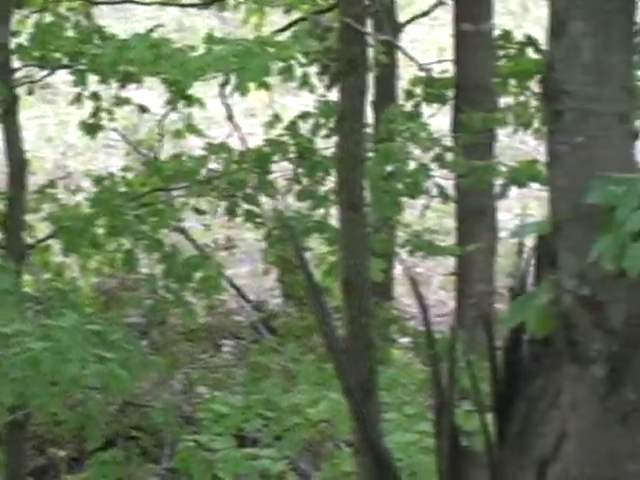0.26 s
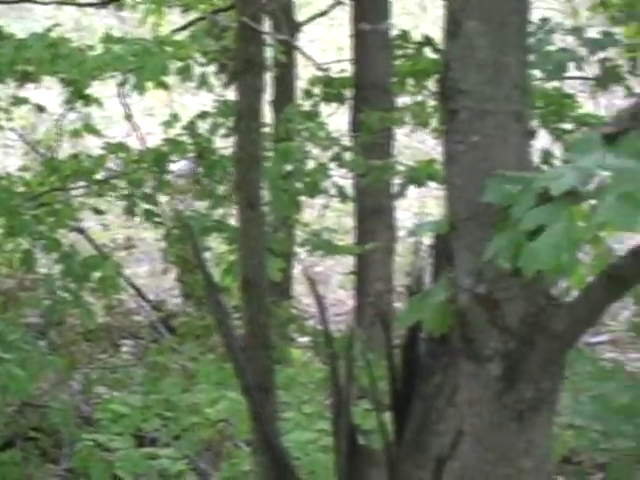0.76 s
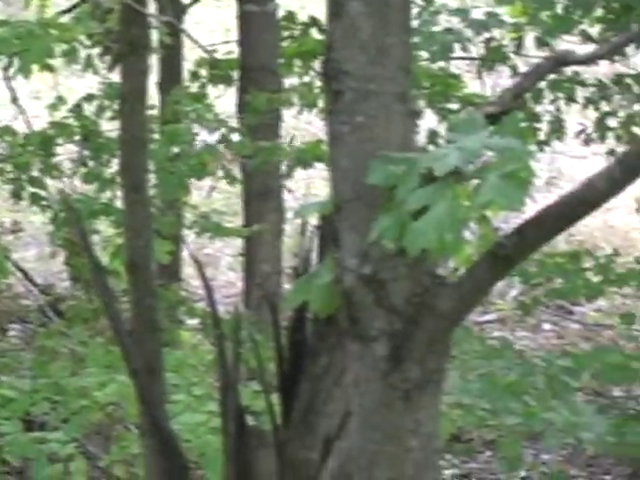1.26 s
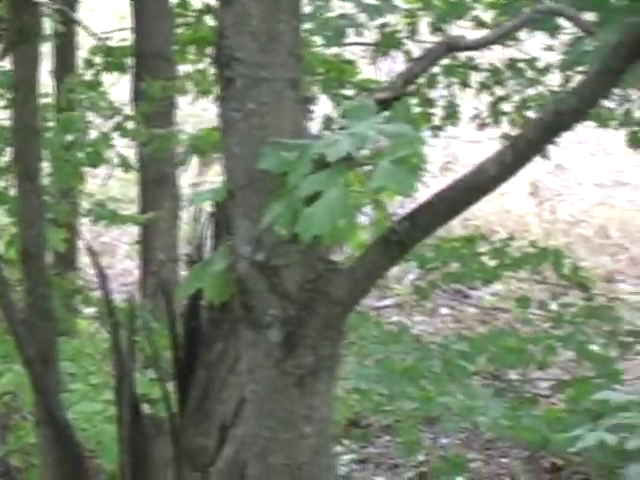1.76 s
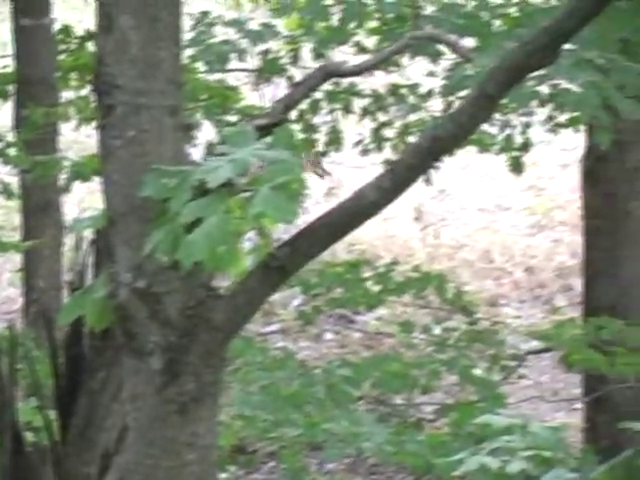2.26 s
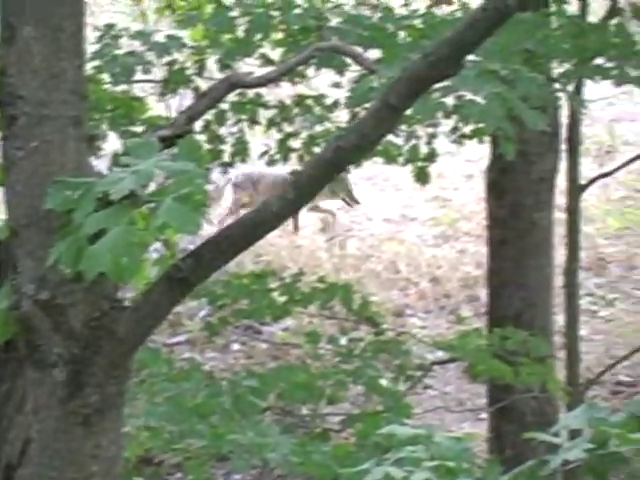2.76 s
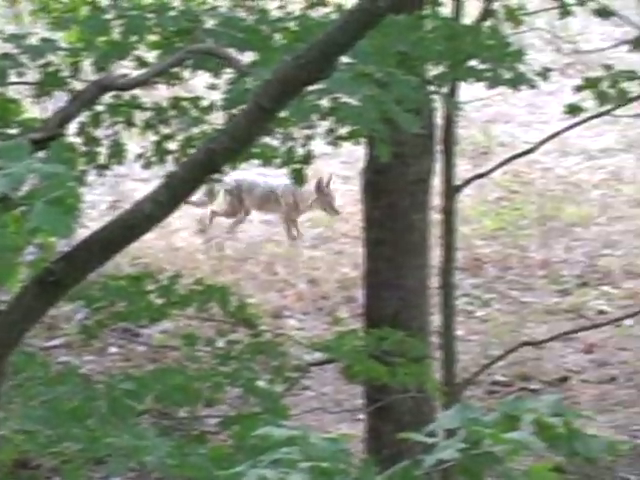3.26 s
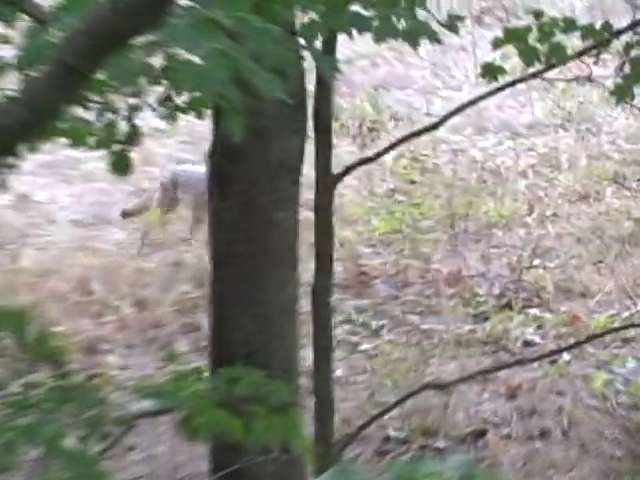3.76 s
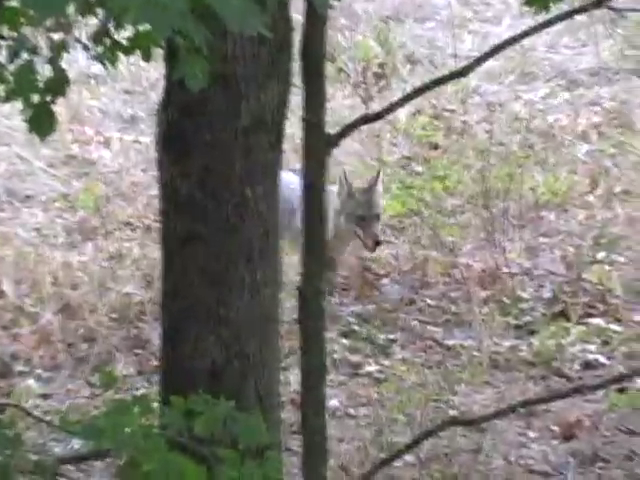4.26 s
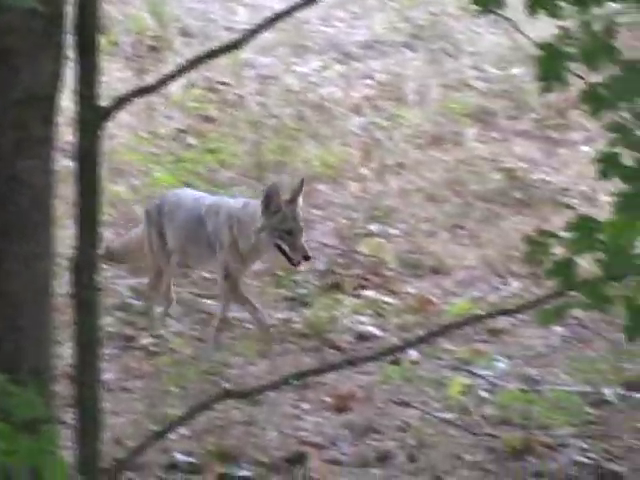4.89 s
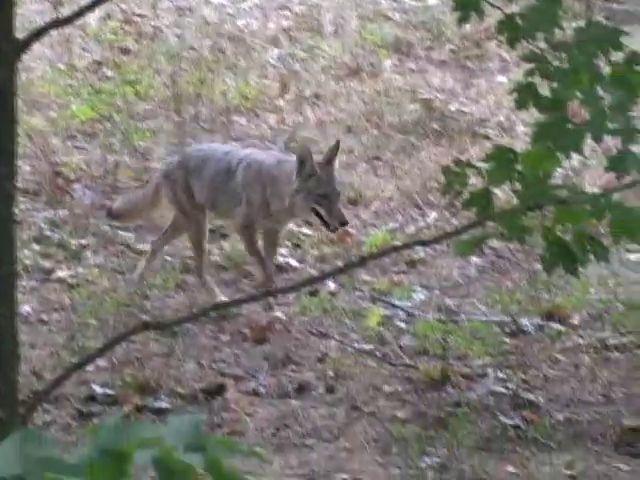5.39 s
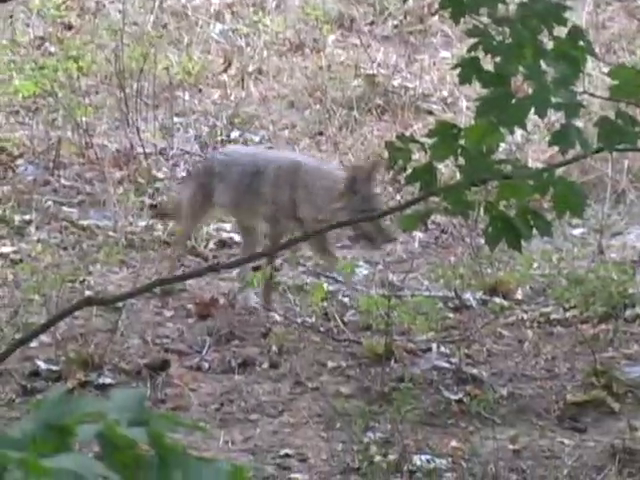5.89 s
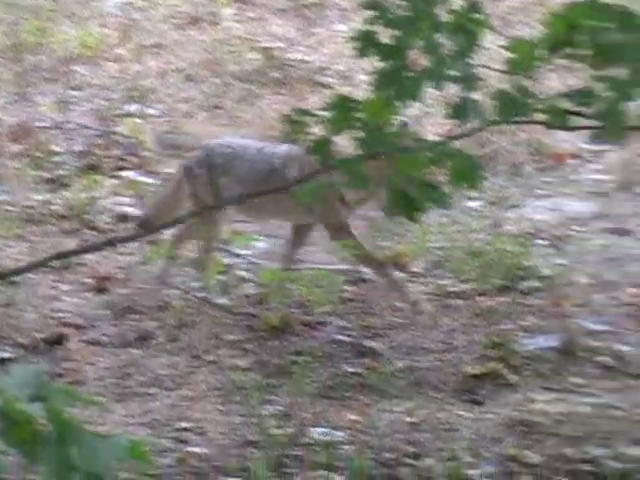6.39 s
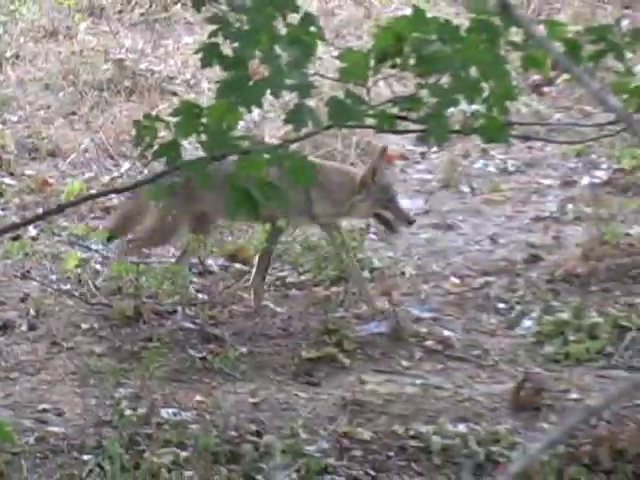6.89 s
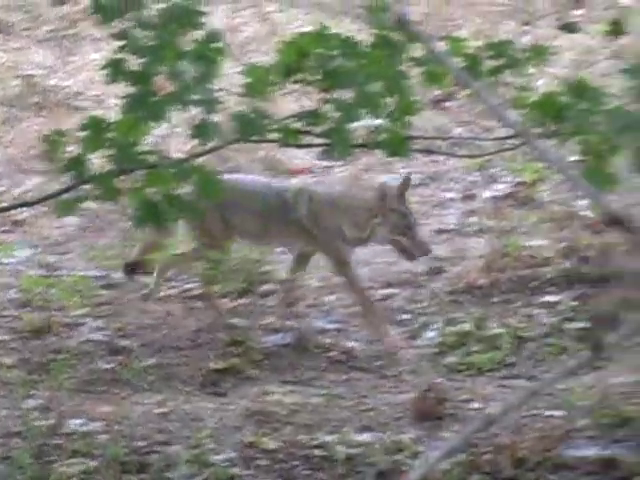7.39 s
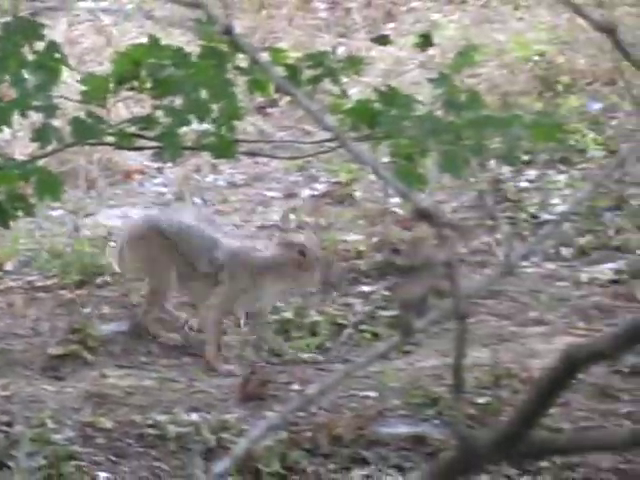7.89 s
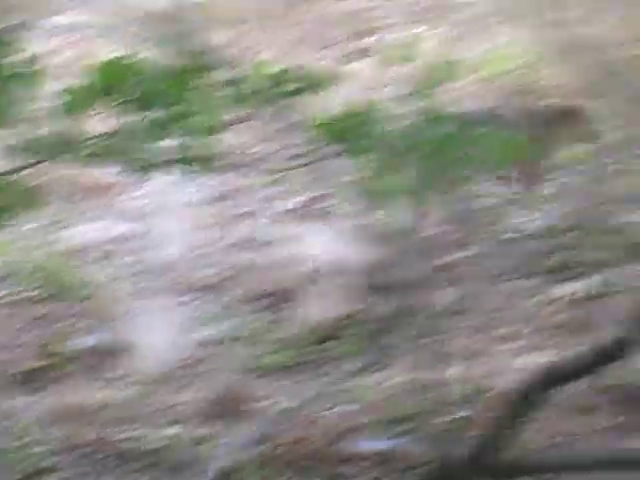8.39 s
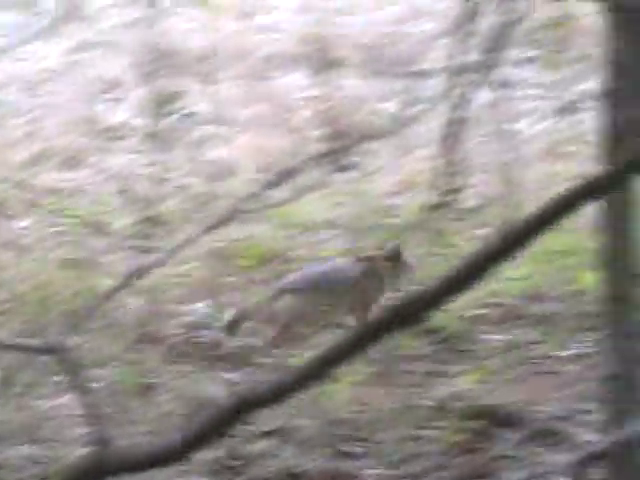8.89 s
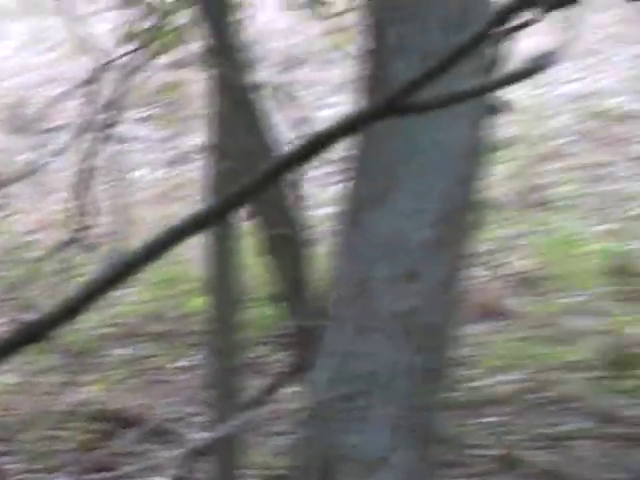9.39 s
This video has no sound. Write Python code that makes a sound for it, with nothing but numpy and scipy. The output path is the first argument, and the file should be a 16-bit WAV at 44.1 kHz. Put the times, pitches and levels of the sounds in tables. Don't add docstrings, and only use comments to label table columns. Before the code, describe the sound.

Crickets and katydids shimmer as paws pad through dry leaves; a bow snaps, an arrow thumps, and the animal bolts, crashing away with a short yelp.

```python
import sys
import numpy as np
from scipy import signal
from scipy.fft import rfft, irfft, next_fast_len
from scipy.io import wavfile
from scipy.ndimage import uniform_filter1d, map_coordinates

SR = 44100
rng = np.random.default_rng(int(sys.argv[2]) if len(sys.argv) > 2 else 0)


def transcribe(u):
    v = np.clip(np.atleast_2d(u).T, -1, 1)
    q = np.round(v * 32767).astype(np.int16)
    wavfile.write(sys.argv[1], SR, q)


def how_loud(loudness_db):
    steps = np.asarray(loudness_db, float) / 20
    return 10 ** steps


N = 425549
TIME = np.arange(N) / SR
BOLT_S = 7.99


def unit(x):
    return x / np.sqrt(np.mean(x ** 2) + 1e-20)


def noise():
    return rng.standard_normal((2, N))


def along(points, hz):
    f, v = np.transpose(points)
    return np.interp(np.log(hz + 1), np.log(f + 1), v)


def curves(rows):
    s, *cols = np.transpose(rows)
    return [np.interp(TIME, s, c, left=-120, right=-120) for c in cols]


def wobble(rate):
    return map_coordinates(rng.standard_normal(int(N * rate / SR) + 4), [TIME * rate])


def filtered(x, response):
    m = next_fast_len(x.shape[-1] + 8192, real=True)
    return irfft(rfft(x, m) * response(np.fft.rfftfreq(m, 1 / SR)), m)[..., :x.shape[-1]]


def spread(pair, spectrum, alike):
    def shares(hz):
        turn = np.arccos(np.clip(along(alike, hz), -1, 1)) / 2
        return how_loud(along(spectrum, hz)) * [np.cos(turn), np.sin(turn)]
    mid, side = filtered(pair, shares)
    return unit(np.array([mid + side, mid - side]))


def onset(t, rise):
    return 1 - np.exp(-t / rise)


def ring(modes, t):
    return sum(how_loud(db + rng.normal(0, 2) - 60 * t / t60) * np.sin(2 * np.pi * hz * t)
               for hz, db, t60 in modes)


def add(track, s, sound):
    start = round(s * SR)
    track[..., start:start + sound.shape[-1]] += sound[..., :N - start]


def swells(start, db, fade, rise, hold=0):
    grid = np.arange(0, N / SR + .002, .001)
    start, fade, hold = (np.reshape(v, (-1, 1)) for v in (start, fade, hold))
    before = np.maximum(start - grid, 0) / (rise * fade)
    after = np.maximum(grid - start - hold, 0) / fade
    return np.interp(TIME, grid, np.sqrt(how_loud(db) ** 2 @ how_loud(-20 * (before + after)) ** 2))


def echo(x):
    # frequency in Hz, t60 in seconds.
    trees = [(200, 0.29), (2000, 0.49), (8000, 1), (15000, 0.37)]
    hz, t, z = signal.stft(rng.standard_normal((2, SR // 2)), SR, nperseg=256)
    tail = signal.istft(z * how_loud(-60 * t / along(trees, hz)[:, None]), SR, nperseg=256)[1]
    late = np.pad(x, (500, 0))[None]
    return signal.fftconvolve(late, tail / np.linalg.norm(tail[0]), axes=1)[:, :N]


def woods():
    # frequency in Hz, density in dB per Hz.
    colour = [(15, -48), (25, -29), (59, -14), (102, -9.5), (148, -6.5), (174, -11.5), (200, -11.5),
              (2520, -24), (4950, -22), (5520, -15.5), (6140, -26), (7830, -15), (9460, -30.5),
              (14600, -50), (15800, -55)]
    # frequency in Hz, left-right likeness.
    alike = [(60, 0.88), (130, 0.27), (300, 0.36), (640, 0.15), (3000, 0.16), (15000, 0.97)]
    # start in seconds, level in dB, fade in seconds.
    gusts = [(.3, -67, 1.5), (.78, -60, 0.81), (1.37, -66, 0.67), (2.69, -61, .5), (3.5, -52, 1.04),
             (3.8, -60, 1), (4.11, -55, 0.4), (5.05, -62, 2.6), (6.86, -61, 0.8), (8.03, -54, 2.2),
             (9.2, -60, 2.4), (9.46, -50.5, .3)]
    floor = how_loud(-53.5 + 0.26 * wobble(1.95)) * spread(noise(), colour, alike)
    low_air = [(60, -45), (170, -4.5), (300, -2.5), (600, -18.0), (1200, -37)]
    stir = spread(noise(), low_air, [(300, 1.0)])
    drone = spread(noise(), [(45, -50), (66, -20), (76, -9), (88, -16.0), (130, -60)], [(76, 0.97)])
    drum_hz = 150 / 1.001
    hum = np.array([[how_loud(-52.5)], [-how_loud(-43)]]) * np.sin(2 * np.pi * drum_hz * TIME)
    s, db, fade = np.transpose(gusts)
    stir_gain = swells(s, db, fade, 0.36) * how_loud(-4.5 + 2.7 * wobble(9.9))
    return floor + stir_gain * stir + how_loud(-62.0) * drone + hum


def singer(hz, glide, life, rate, jitter, left_db, right_db, skips=(), uneven_db=1.0):
    marks = np.array([-1, *skips, N / SR + 1]) - life / 6
    missed = np.cumsum(np.round(np.diff(marks, prepend=-2) * rate))
    beat = np.floor(np.interp(TIME, marks, missed) + jitter * wobble(6.5) + 1e-6)
    strokes = (np.diff(beat, prepend=beat[0]) > 0) * ~np.isin(beat, missed)
    strokes = strokes * how_loud(uneven_db * (wobble(40) + wobble(5) / 2))
    age = np.arange(SR // 20) / SR / life
    pitch = hz * (1 + glide * (5 * age - 1))
    stroke = age ** 2 * np.exp(-12 * age) * np.sin(2 * np.pi * np.cumsum(pitch) / SR)
    return unit(signal.oaconvolve(strokes, stroke)[:N]) * how_loud([[left_db], [right_db]])


def insects():
    # pitch in Hz, glide share, stroke life in seconds, pulses per second,
    # jitter in strokes, left level in dB, right level in dB.
    cricket = (5600, -.045, .016, 71, .03, -59, -65)
    katydid = (7740, .035, .05, 26.5, .22, -69, -60)
    skips = [.061, .231, .336, .793, 1.033, 1.11, 1.343, 1.499, 1.739, 1.81, 2.063, 2.47, 2.625, 3.105,
             3.261, 4.42, 4.66, 4.744, 4.835, 4.911, 4.996, 5.081, 5.165, 5.25, 5.334, 5.503, 6.496, 7.234,
             7.318, 7.403, 7.487, 7.571]
    # start in seconds, hold in seconds, level in dB.
    chirps = [(0, 0.65, -63.5), (.83, 0.22, -65), (1.36, .17, -66), (1.8, 0.15, -61), (2.198, .26, -61),
              (2.75, 0.41, -63), (3.33, 0.46, -61), (4.0, 0.16, -59), (4.62, .26, -63), (5.03, .03, -66),
              (5.67, .18, -61), (6.25, 0.26, -65), (7.07, 0.27, -60), (7.5, .03, -68)]
    # frequency in Hz, density in dB per Hz.
    many = [(6300, -30), (6900, -7.5), (7700, -4), (8300, -7), (9000, -22)]
    chorus = how_loud(-54.0 + 0.99 * wobble(20)) * spread(noise(), many, [(7000, 0.4)])
    far_colour = [(4100, -40), (4300, -3), (4450, -1), (4600, -2), (4800, -36)]
    blur = spread(noise(), far_colour, [(4400, 0.72)])
    near = how_loud(0.8) * singer(*cricket, skips) + how_loud(1.7) * singer(*katydid)
    s, hold, db = np.transpose(chirps)
    pulses = how_loud(5 * np.cos(2 * np.pi * 19 * TIME) - 4.0)
    return near + swells(s, db - 2.0, 0.21, 0.66, hold) * pulses * blur + chorus


def crackle(density):
    size_db = np.minimum(2.2 * rng.exponential(size=(2, N)), 9)
    clicks = (rng.random((2, N)) < density / SR) * how_loud(size_db) * rng.choice([-1, 1], (2, N))
    clumps = how_loud(.5 * wobble(70) + 1.3 * wobble(300))
    return (noise() + .8 * unit(clicks)) * clumps


def snapping():
    # time in seconds, peak in dB, pitch in Hz.
    twigs = [(0.0335, -46, 4410), (0.1374, -44, 4840), (0.231, -44, 4890), (0.5786, -48, 3910),
             (3.189, -52, 2150), (3.253, -52.5, 1950), (3.6102, -55, 2000), (3.7085, -48, 4230),
             (3.824, -48, 4780), (4.123, -44, 3400), (4.2256, -47, 3300), (4.007, -52, 3100),
             (4.055, -50.5, 3100), (.82, -53, 1500), (.845, -54, 1700), (.89, -54, 2000),
             (4.3374, -49, 4930), (5.4324, -58, 3400), (6.7695, -47, 3300), (6.805, -47, 3140),
             (6.8649, -46, 3250), (6.849, -52, 2600), (6.882, -52, 4200), (1.953, -58, 2400),
             (2.043, -58, 3100), (4.337, -51, 2500), (4.372, -56, 2380)]
    ticks = [(0.266, -35, 12900), (0.2922, -38, 12900), (0.3446, -39, 13000), (2.2766, -37, 13600),
             (6.5964, -41, 12300), (7.1571, -50, 12300), (7.1896, -49, 12400), (7.5797, -48, 10600),
             (8.3428, -21, 10000), (8.343, -23, 6000), (8.6884, -22, 11000), (8.6886, -24, 6500),
             (8.6925, -23, 10500), (8.6924, -19, 7000), (8.062, -36, 11000), (9.122, -32, 8000),
             (8.1249, -29.5, 3810), (8.3874, -22, 5500), (8.7258, -24, 4860), (8.761, -27.5, 5490),
              (8.8024, -27, 3810), (8.842, -21.5, 5020), (8.9744, -26, 6500), (9.0555, -29, 6900),
              (8.9015, -20, 5000), (8.3105, -22, 5200), (8.57, -23, 5500), (8.505, -30, 5500),
              (8.5225, -30, 5500), (9.1238, -29, 7500), (9.2247, -30, 6000), (9.4635, -28, 5300),
              (9.563, -34, 5500), (9.645, -34, 5500), (8.305, -25, 7500), (8.5385, -28, 4800),
              (8.5535, -25, 5500), (9.176, -26, 5500)]
    sticks = [(7.9805, -27.5, 6900), (8.015, -36, 2400), (8.258, -43, 1500), (8.304, -36.5, 1250),
              (8.315, -43, 620), (8.35, -43, 620), (8.384, -42, 1250), (8.545, -40, 2630),
              (8.585, -44, 2900), (8.81, -44, 700), (8.9, -44, 1000), (9.0545, -28.5, 6900),
              (9.078, -35, 7000), (9.172, -43, 1500), (9.46, -41, 2800), (9.49, -38, 3100)]
    # breaks, t60 in seconds, rise in seconds, resonance width over pitch.
    kinds = [(twigs, 0.05, 0.0027, 0.66), (ticks, 0.0046, 0.00023, .85),
             (sticks, 0.048, 0.0027, 0.73)]
    snaps, t = np.zeros(N), np.arange(SR // 4) / SR
    for breaks, t60, rise, width in kinds:
        for s, db, hz in breaks:
            grit = filtered(rng.standard_normal(len(t)),
                            lambda f: (1j * f * hz / (hz * hz - f * f + 1j * f * width * hz)) ** 2)
            add(snaps, s, how_loud(db + 3.5 - 60 * t / t60) * onset(t, rise) * unit(grit))
    return snaps


def walking():
    # start in seconds, rustle in dB, brightness in dB, fade in seconds.
    steps = [(.05, -64, -12, 0.6), (.24, -57, -4, 0.53), (.57, -59, 5, .3), (.85, -56.5, 2, 0.29),
             (1.17, -61.5, -4, .35), (1.47, -59, 0, 0.3), (1.68, -79, -4, 0.093), (1.78, -71, -3, .1),
             (2.06, -66, 2, 0.44), (2.33, -62, 3, 0.22), (2.7, -63, 3, 0.69), (2.87, -62.5, 2, 0.08),
             (3.05, -66.5, 7, 0.68), (3.25, -71, 2, 0.19), (3.37, -66, -9, 0.031), (3.48, -70, -9, 0.13),
             (3.71, -60.5, -1, 0.29), (4.03, -56, -2, 0.22), (4.14, -60.5, -2, .15), (4.24, -60, -5, 0.13),
             (4.33, -59.5, -1, 0.17), (4.58, -61, 9, 0.11), (5.03, -61, 1, .03), (5.5, -60, 1, 0.066),
             (5.96, -63, 2, 0.18), (6.2, -62.5, -3, 0.39), (6.6, -61, 7, 0.14), (6.78, -58, 4, 0.12),
             (6.88, -56.5, -1, 0.27), (7.17, -60, 3, .08), (7.36, -62.5, -13, .15), (7.47, -67, -3, .3)]
    s, db, bright_db, fade = np.transpose(steps)
    return [swells(s, db + more_db, fade, 0.63) for more_db in (7, bright_db - 5.5)]


def leaves():
    # frequency in Hz, density in dB per Hz.
    dry_leaves = [(710, -33), (1200, -16), (1750, -13.5), (3300, -5), (4820, 0.5), (6250, -2.5), (7190, -1),
                  (8180, -5.5), (12600, -19), (14800, -40), (15800, -60)]
    # frequency in Hz, density in dB per Hz.
    soft_ground = [(150, -31), (250, -11), (634, 3.5), (823, -1), (1300, -3), (1800, -11), (2600, -44),
                   (4400, -120)]
    # time in seconds, level in dB.
    canopy = [(0, -70), (2.4, -68.5), (3.3, -68), (3.7, -72), (6.4, -90), (7.6, -91)]
    alike = [(300, 0.89), (1400, 0.85), (7000, 0.92), (15000, 0.89)]
    body = spread(crackle(4000), dry_leaves, alike)
    treble = [(6000, -22), (9500, 1), (13000, 0.0), (14900, -8), (15800, -27)]
    crisp = spread(crackle(3000), treble, alike)
    paws = spread(crackle(1600), soft_ground, alike)
    walk, walk_crisp = walking()
    weight, weight_crisp, weight_paw = bolting()
    litter = (walk + weight) * body
    litter += (np.hypot(walk_crisp, how_loud(curves(canopy)[0])) + weight_crisp) * crisp
    litter += (weight_paw + how_loud(-17) * walk) * paws
    snaps = snapping()
    return litter + snaps + how_loud(-9.5) * echo(snaps)


def crow():
    # middle in seconds, pitch in Hz, level in dB.
    caws = [(1.42, 1303, -63), (2.08, 1415, -61), (2.6, 1680, -61), (2.74, 1404, -58.5), (3.45, 1384, -61),
            (4.18, 1320, -58.5), (4.879, 1290, -61), (5.55, 1306, -60), (6.199, 1340, -61),
            (6.88, 1350, -71)]
    calls, u = np.zeros(N), np.linspace(-1, 1, SR // 6)
    for s, hz, db in caws:
        pitch = hz * (1 - 0.0986 * u ** 2 - 0.042 * u)
        hoarse = unit(uniform_filter1d(rng.standard_normal(len(u)), size=170)) + 0.67
        tone = np.sin(2 * np.pi * np.cumsum(pitch) / SR)
        add(calls, s - 1 / 12, how_loud(db - 5.0) * (1 - u ** 2) * hoarse * tone)
    return calls


def limb_knock():
    # frequency in Hz, level in dB, t60 in seconds.
    modes = [(397, -7, 0.092), (500, -5, .03), (612, 3.5, 0.03), (700, -0.5, 0.034), (916, 0, 0.021),
             (1130, -2, 0.028), (1346, -7, 0.07), (1710, -0.5, 0.027), (2110, -4, 0.022), (2640, -8, 0.023),
             (3100, -13, .02), (4200, -19, .012)]
    # time in seconds, level in dB.
    taps = [
        (3.3642, -47),
        (3.3657, -32.5),
        (3.37, -47),
        (3.377, -49),
    ]
    t, taps_heard = np.arange(SR // 2) / SR, np.zeros(N)
    for s, db in taps:
        dull = uniform_filter1d(rng.standard_normal(len(t)), size=16)
        tap = ring(modes, t) * onset(t, 0.0004) + 3 * how_loud(-60 * t / 0.039) * dull
        add(taps_heard, s, how_loud(db) * tap)
    return taps_heard


def twang(t):
    # multiple of its pitch, level in dB.
    partials = [(2, 2), (3, -4), (4, 2), (5, -9), (6, -13), (7, -5), (8, -7), (9, -9)]
    pitch_hz, t60 = 97.5, 0.21
    swing = sum(how_loud(db - 60 * t / t60 * (1 + 0.041 * k)) * np.cos(2 * np.pi * k * pitch_hz * t)
                for k, db in partials)
    return -how_loud(-21.5) * swing * (1 - np.exp(-(t / 0.013) ** 2))


def string_slaps():
    # time in seconds, ring in dB, clatter in dB.
    slaps = [(7.6677, -29, -18.5), (7.6706, -14, -14.5), (7.6768, -19.5, -14.5), (7.679, -34, -16),
             (7.684, -29, -19), (7.688, -32, -25), (7.693, -31, -27), (7.7, -31, -29), (7.71, -29, -24),
             (7.7215, -40, -29), (7.7303, -36, -31), (7.741, -49, -37), (7.758, -37, -39),
             (7.79, -40.5, -57)]
    # frequency in Hz, level in dB, t60 in seconds.
    limbs = [(189, -2, 0.12), (295, 3, 0.049), (341, 6.5, 0.058), (455, -2, 0.075), (647, -2.5, 0.058),
             (715, -7.5, 0.15), (529, -3.5, 0.11)]
    # frequency in Hz, level in dB, t60 in seconds.
    grip = [(1000, -12, 0.064), (1385, 1.5, 0.073), (2250, 0.5, 0.042), (2740, -26, 0.04), (3080, -18, .05),
            (4130, -8, .04), (4950, 4, 0.027), (5700, -5, 0.025), (7440, 2, .04), (11000, -14, 0.07)]
    t = np.arange(SR // 2) / SR
    frame, clatter_gain = np.zeros(N), np.zeros(N)
    for s, ring_db, clatter_db in slaps:
        tired_db = 150 * (s - slaps[0][0])
        limb_ring = -how_loud(ring_db - 3.5) * ring(limbs, t)
        grip_ring = how_loud(clatter_db - 6.5 - tired_db) * ring(grip, t) * onset(t, .004)
        add(frame, s, (limb_ring + grip_ring) * onset(t, 0.0016))
        add(clatter_gain, s, how_loud(clatter_db - 60 * t / 0.034) * onset(t, 0.00078))
    add(frame, 7.6897, twang(t))
    return frame, clatter_gain


def bow():
    # time in seconds, level in dB.
    whoosh = [
        (7.62, -63),
        (7.655, -48.5),
        (7.661, -34),
        (7.672, -27),
        (7.745, -35.5),
        (7.8, -50),
        (7.9, -58.5),
        (7.99, -47.5),
    ]
    # frequency in Hz, density in dB per Hz.
    rush = [(300, -2), (1000, -7), (2500, -3), (6000, -8.5), (11000, -14), (14000, -11), (15800, -27)]
    # frequency in Hz, density in dB per Hz.
    rattle = [(290, -7.5), (500, -12), (687, -8), (878, -23), (1370, -7), (1840, -19), (2280, -8.5),
              (3830, -18.5), (7670, -14), (15800, -31)]
    # frequency in Hz, left minus right in dB.
    balance = [(60, -9), (180, 1), (550, -3), (1650, -8), (4970, -15.5), (15000, -3)]
    # frequency in Hz, left-right likeness.
    alike = [(60, 0.98), (180, 0.89), (550, 0.78), (1650, 0.41), (4970, 0.28), (15000, 0.13)]
    tapping = limb_knock()
    frame, clatter_gain = string_slaps()
    rush_db, = curves(whoosh)
    clatter = clatter_gain * spread(noise(), rattle, alike)
    clatter += how_loud(rush_db) * spread(noise(), rush, alike)

    def to_ports(hz):
        lag_s = .00008
        lag = np.exp(-1j * np.pi * hz * lag_s * np.array([[1], [-1]]))
        return how_loud(along(balance, hz) * [[.5], [-.5]]) * lag
    near = filtered(frame + clatter, to_ports)
    return near + tapping * how_loud([[-.6], [.6]]) + how_loud(-14.5) * echo(near.mean(0) + 1.3 * tapping)


def arrow():
    # time in seconds, crack in dB, thump in dB, t60 in seconds.
    hits = [
        (7.971, -16.5, -22, 0.021),
        (7.9747, -16, -20, 0.016),
        (7.9803, -21, -18.5, 0.02),
        (7.984, -26, -38, 0.077),
    ]
    # frequency in Hz, density in dB per Hz.
    crack_colour = [(150, -38), (250, -6), (660, 0), (1070, -12), (1600, 4), (1900, -6), (2600, 4),
                    (4000, -5.5), (5030, 1.5), (7500, -10), (13500, -21), (15800, -29)]
    # frequency in Hz, level in dB, t60 in seconds.
    soil = [(123, 2, 0.055), (196, -5, 0.033), (467, -16, 0.02)]
    # time in seconds, level in dB.
    shaft = [
        (7.9706, -18),
        (7.9743, -15.5),
    ]
    t, hit = np.arange(SR // 4) / SR, np.zeros(N)
    for s, crack_db, thump_db, t60 in hits:
        crack = unit(filtered(rng.standard_normal(len(t)), lambda hz: how_loud(along(crack_colour, hz))))
        thump = how_loud(thump_db) * ring(soil, t) * onset(t, 0.0017)
        add(hit, s, how_loud(crack_db - 60 * t / t60) * crack - thump)
    for s, db in shaft:
        add(hit, s, how_loud(db - 60 * t / 0.0091) * np.sin(2 * np.pi * 513 * t))
    return hit + how_loud(-10.0) * echo(hit)


def bolting():
    # start in seconds, rustle in dB, brightness in dB, paw in dB, fade in seconds.
    bounds = [(7.995, -26.5, -10, -12.5, 0.17), (8.15, -28.5, -4, -20, 0.14), (8.334, -24, -5, -18, 0.22),
              (8.575, -26.5, -1.5, -15, 0.23), (8.64, -29.5, -8, -18.5, 0.37),
              (8.806, -29.5, -2, -18.5, 0.22), (8.89, -29, -2.5, -18, 0.19), (9.03, -34, -6, -19, 0.43),
              (9.17, -29.5, -4.5, -13.5, 0.088), (9.25, -37.5, -3.5, -8.5, 0.29),
              (9.466, -32.5, -6.5, -17.5, 0.17), (9.65, -36.5, -8, -6, .1)]
    # time in seconds, peak in dB, t60 in seconds.
    strides = [(8.122, -28, .04), (8.1465, -21, .06), (8.155, -25, 0.06), (8.257, -24, 0.14),
               (8.302, -15, 0.053), (8.3424, -32, 0.025), (8.5216, -30, 0.086), (8.537, -23.5, 0.1),
               (8.5694, -32, 0.066), (8.31, -25, .04), (8.3265, -33, 0.04), (9.172, -26, .06),
               (9.222, -34, .05), (8.6911, -28, .06), (8.7256, -27, 0.062), (8.8064, -20, 0.057),
               (8.879, -26, 0.1), (8.898, -23, 0.066), (8.9745, -35, .05), (9.052, -16, 0.034),
               (9.058, -28, 0.036), (9.1214, -30, .07), (9.1526, -32, 0.054), (9.452, -32, 0.054),
               (9.462, -39, 0.056)]
    s, db, bright_db, paw_db, fade = np.transpose(bounds)
    settle = how_loud(-37.5 - 2.5 * (TIME - BOLT_S))
    run, run_crisp, run_paw = (np.hypot(swells(s, db + leap_db, fade, 0.51), settle * how_loud(settle_db))
                               for leap_db, settle_db in ((0, 0), (bright_db, -11), (paw_db, -14)))
    weight, t = how_loud(-5.5) * run, np.arange(SR // 4) / SR
    for s, db, t60 in strides:
        add(weight, s, how_loud(db - 11 - 60 * t / t60) * onset(t, 0.0036))
    weight *= TIME > BOLT_S
    return weight, weight * how_loud(-4.5) * run_crisp / run, weight * how_loud(-1.5) * run_paw / run


def yelp():
    # start in seconds, hold in seconds, pitch in Hz, level in dB.
    cries = [
        (9.176, 0.012, 924, -41.5),
        (9.204, 0.032, 1000, -42),
        (9.246, 0.016, 988, -38),
    ]
    s, hold, hz, db = np.transpose(cries)
    end = s[-1] + hold[-1]
    sag = 2800 * (np.maximum(s[0] - TIME, 0) + np.maximum(TIME - end, 0))
    pitch_hz = np.maximum(np.interp(TIME, s + hold / 2, hz) - sag, 0)
    gain = swells(s, db, 0.013, 0.45, hold) + swells([end], [-56], .04, .2, 0.022)
    phase = 2 * np.pi * np.cumsum(pitch_hz * (1 + 0.0093 * wobble(80))) / SR
    voice = np.sin(phase) + 0.055 * np.sin(2 * phase)
    cry = np.sqrt(2) * gain * how_loud(1.2 * wobble(90)) * voice
    return cry + how_loud(-15) * echo(cry)


def scene():
    blows = filtered(bow() + arrow(), lambda hz: (1j * hz / (85 + 1j * hz)) ** 2)
    return woods() + insects() + leaves() + crow() + blows + yelp()


def band_limit(x):
    return signal.sosfilt(signal.butter(12, 16530, fs=SR, output="sos"), x)


def record(dry):
    ceiling, top_hz = 1.05, 15800
    held = dry / (1 + np.abs(dry / ceiling) ** 6) ** (1 / 6)
    return band_limit(filtered(held, lambda hz: hz < top_hz))


dry = scene()
out = record(dry)
transcribe(out)
```